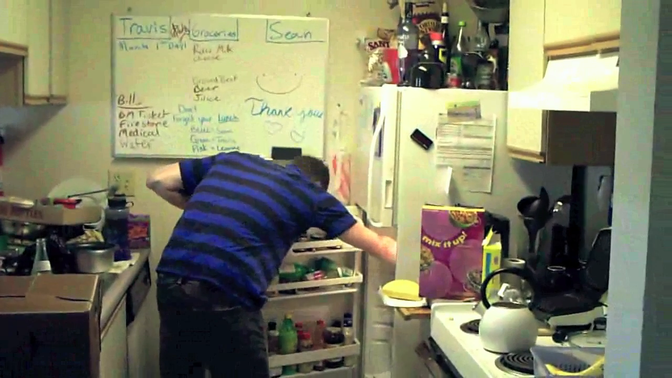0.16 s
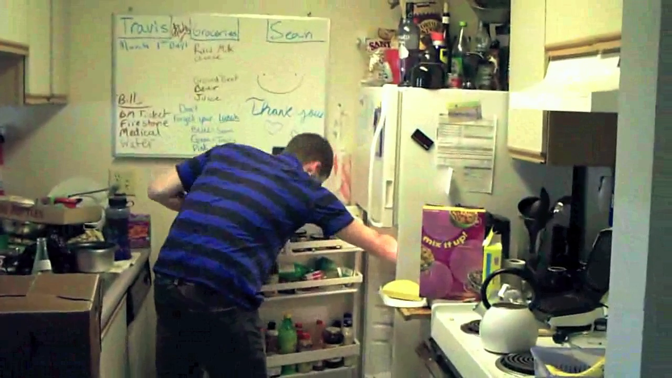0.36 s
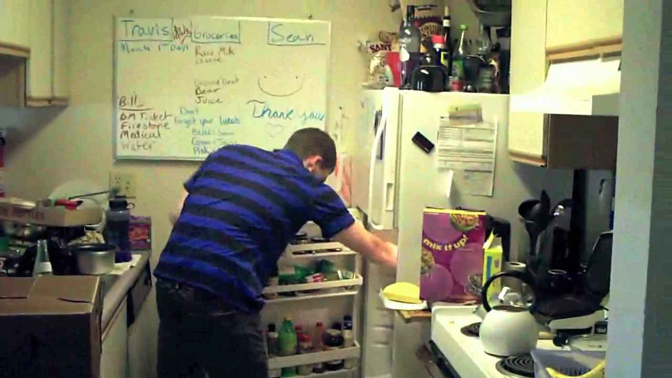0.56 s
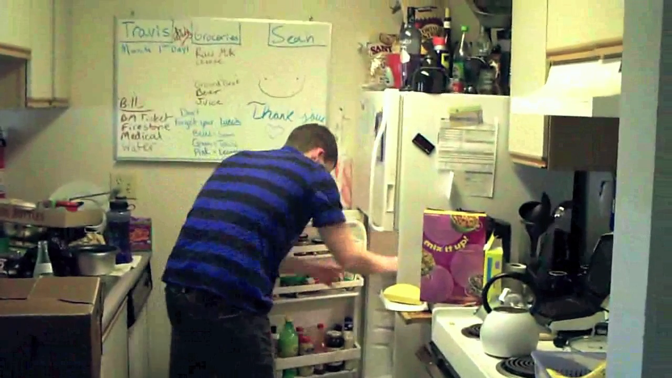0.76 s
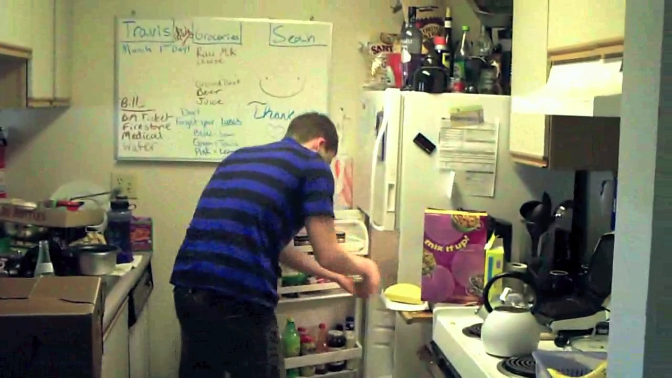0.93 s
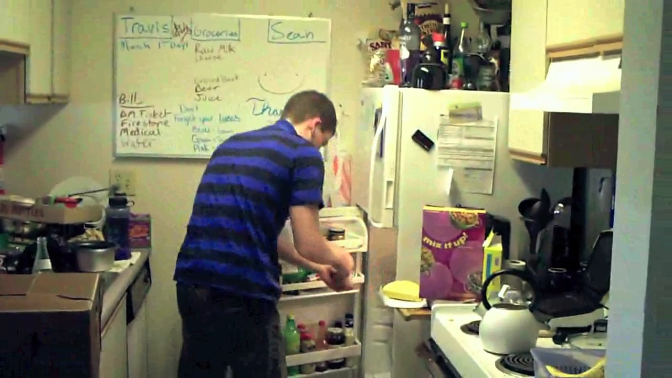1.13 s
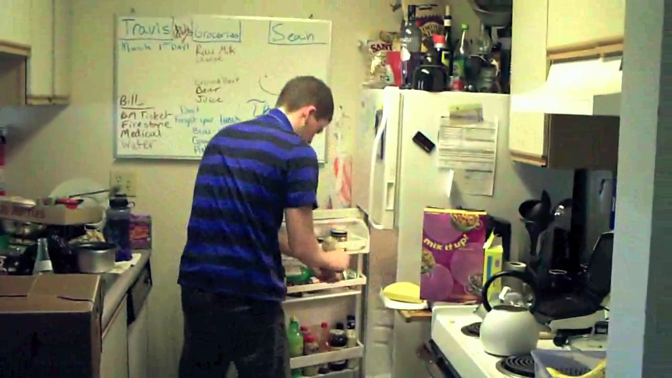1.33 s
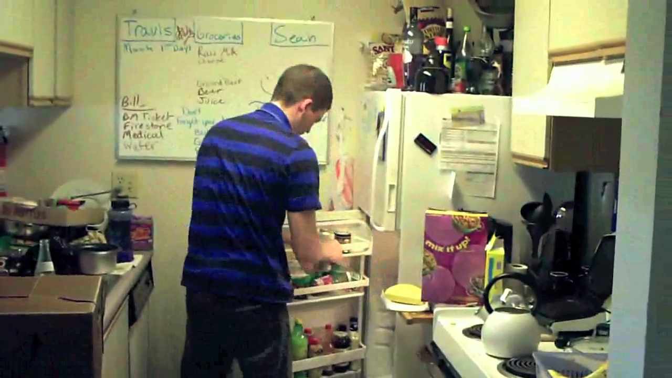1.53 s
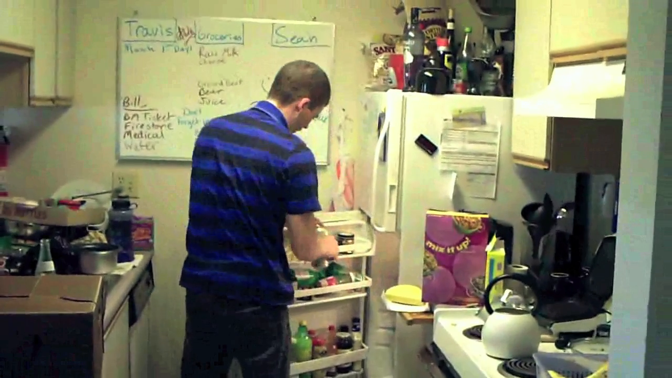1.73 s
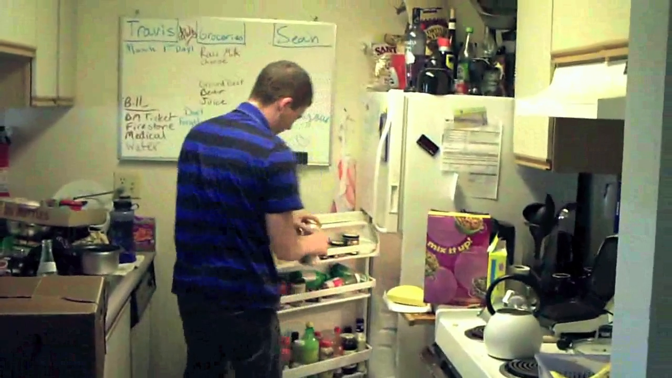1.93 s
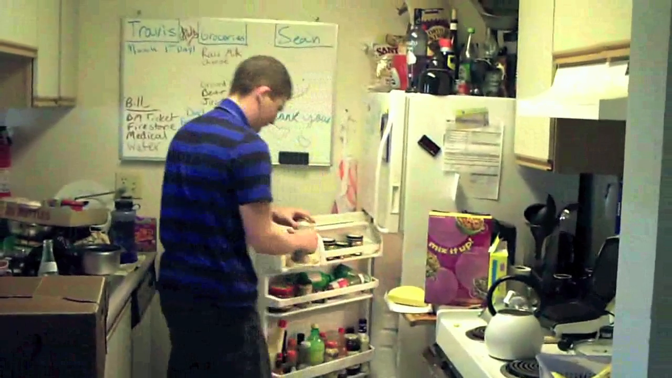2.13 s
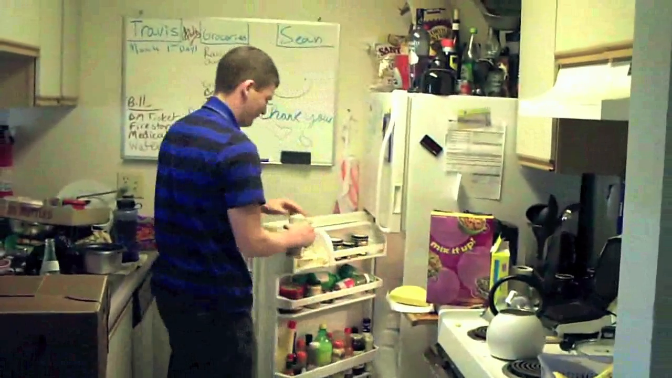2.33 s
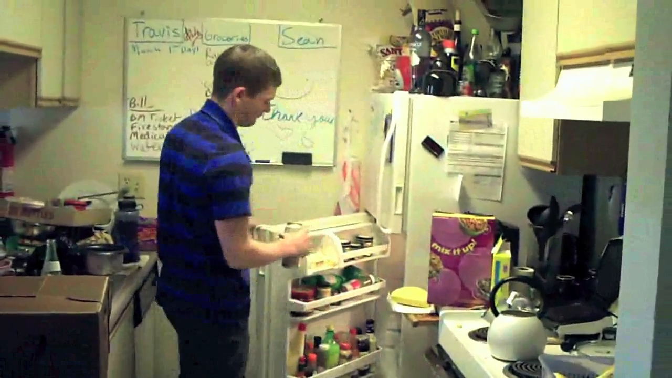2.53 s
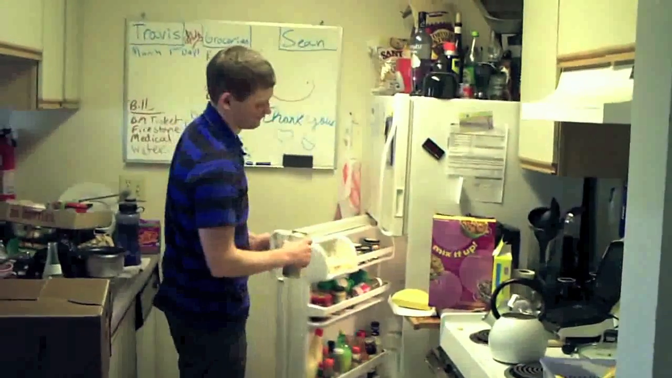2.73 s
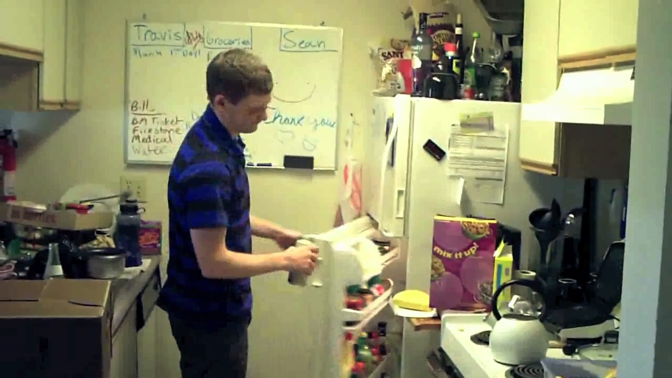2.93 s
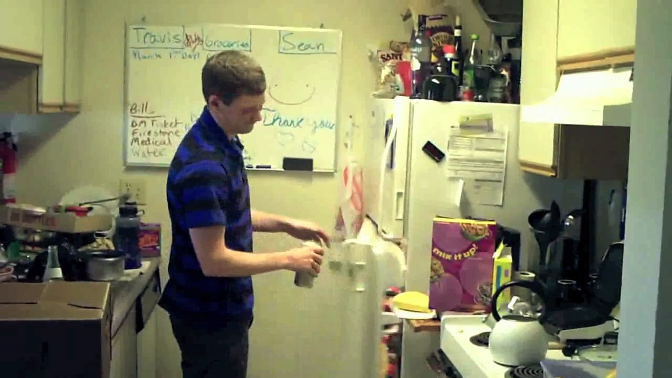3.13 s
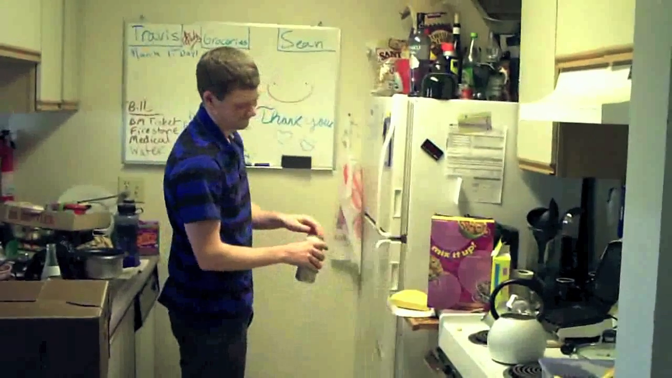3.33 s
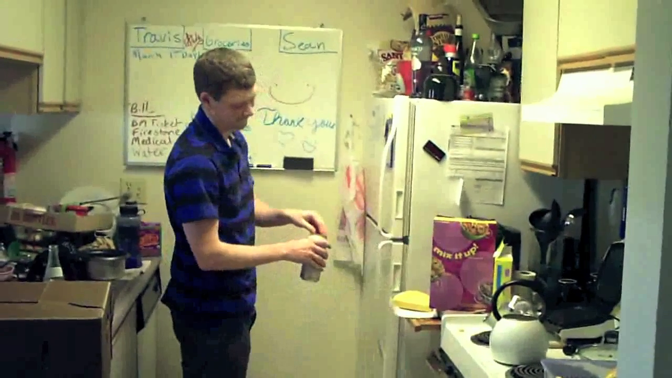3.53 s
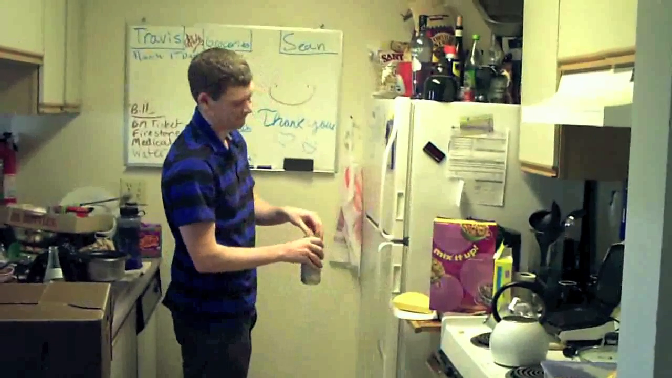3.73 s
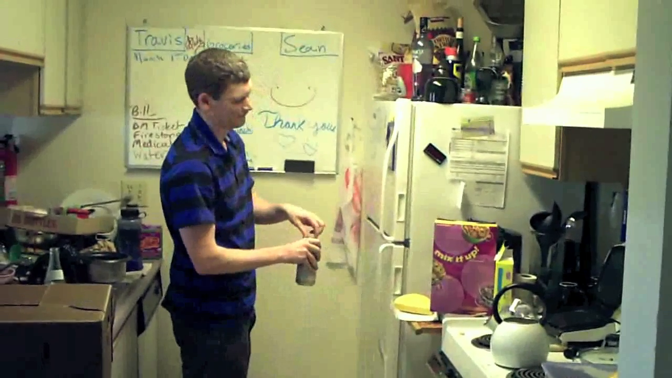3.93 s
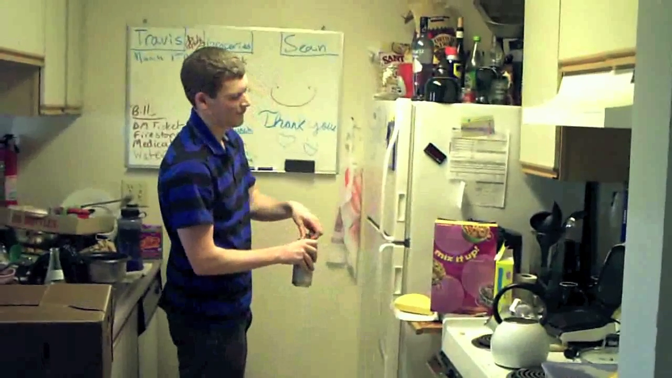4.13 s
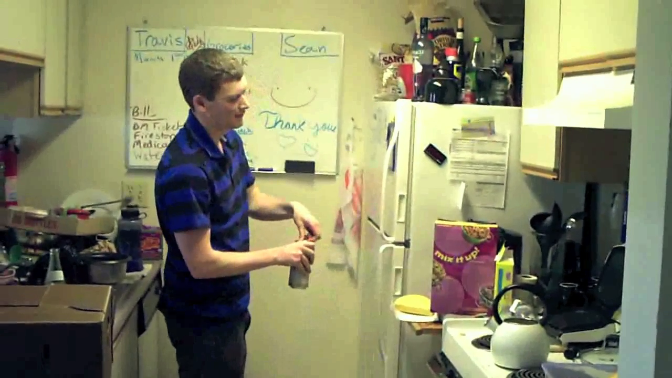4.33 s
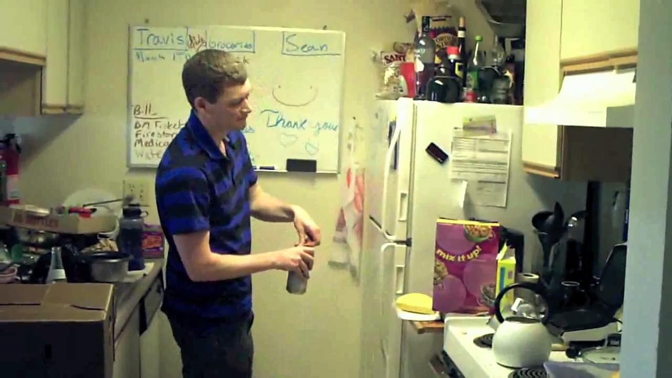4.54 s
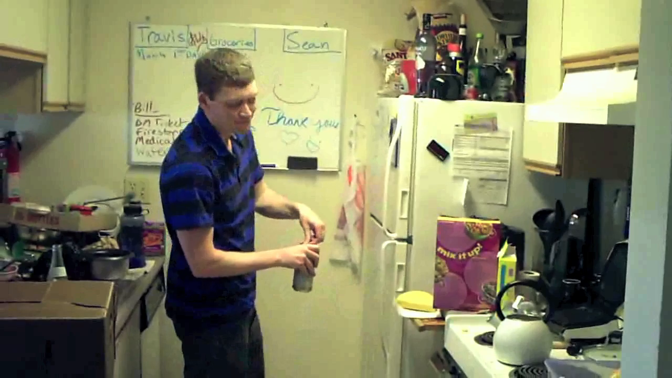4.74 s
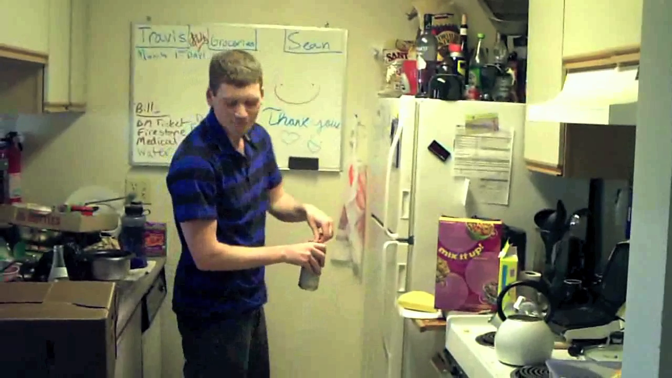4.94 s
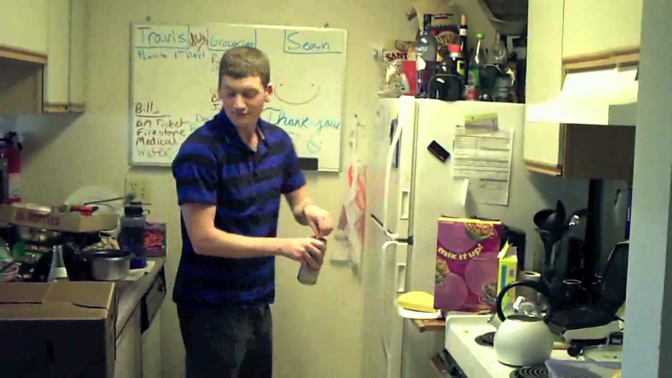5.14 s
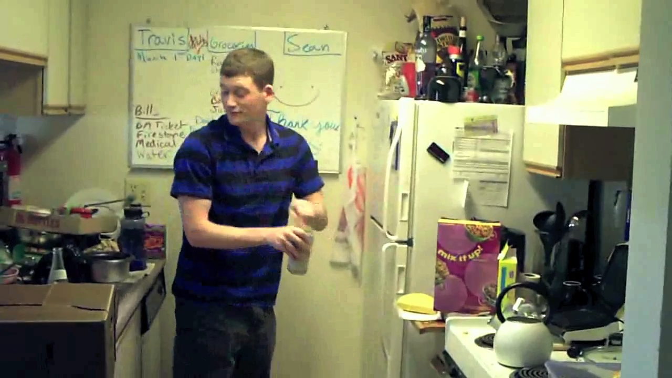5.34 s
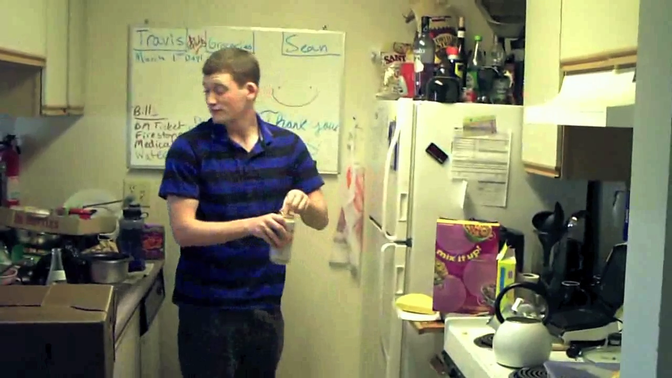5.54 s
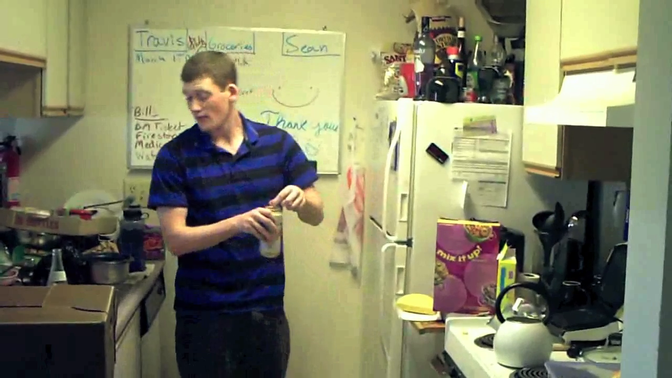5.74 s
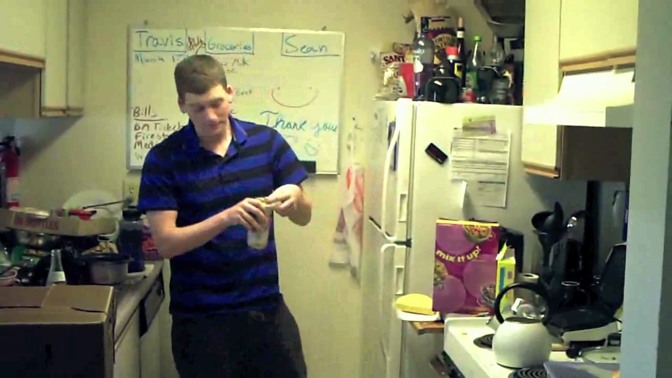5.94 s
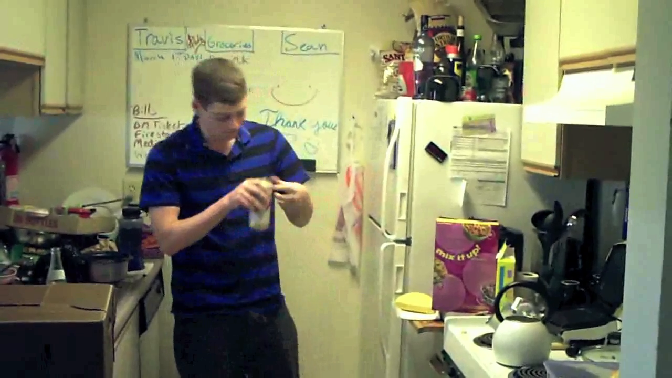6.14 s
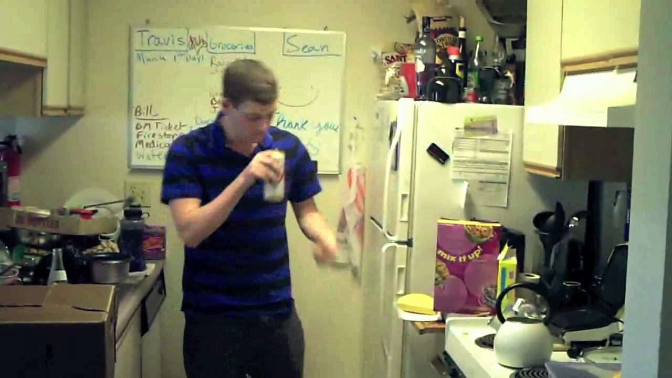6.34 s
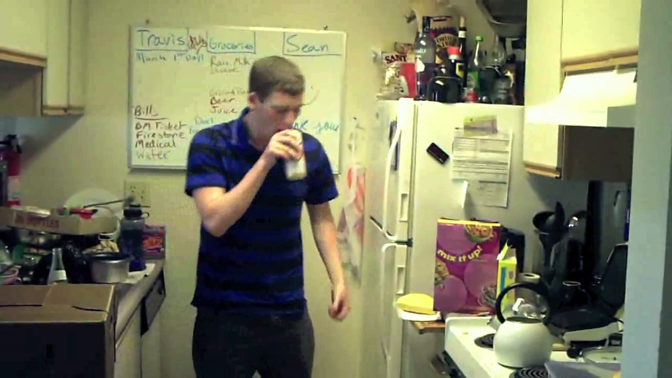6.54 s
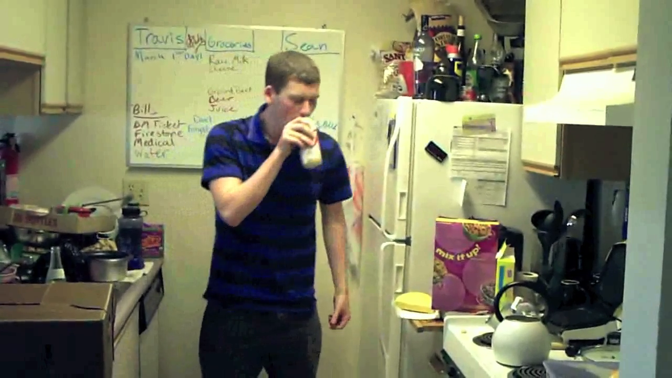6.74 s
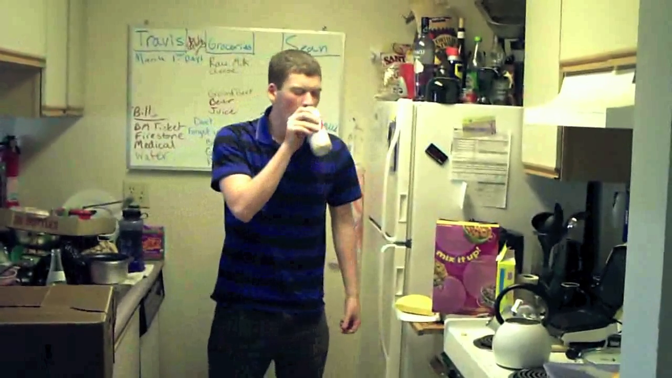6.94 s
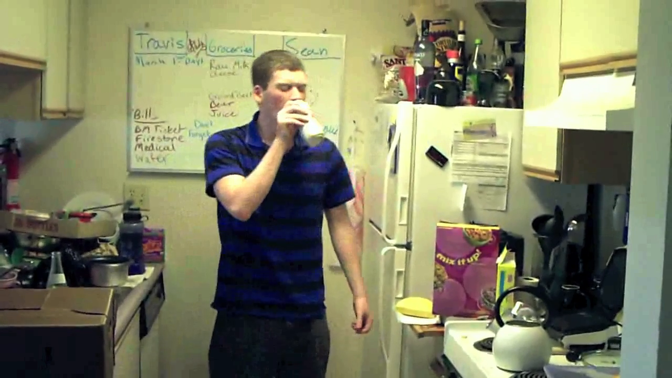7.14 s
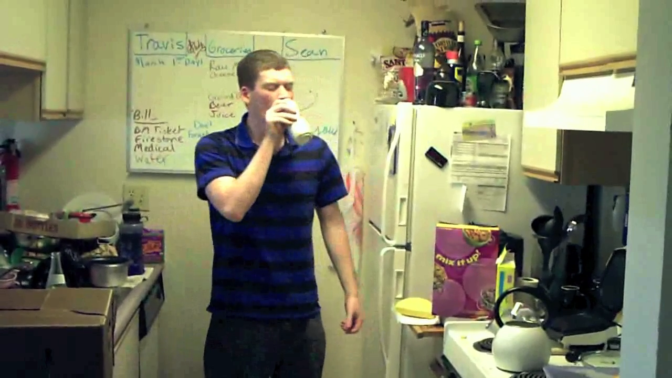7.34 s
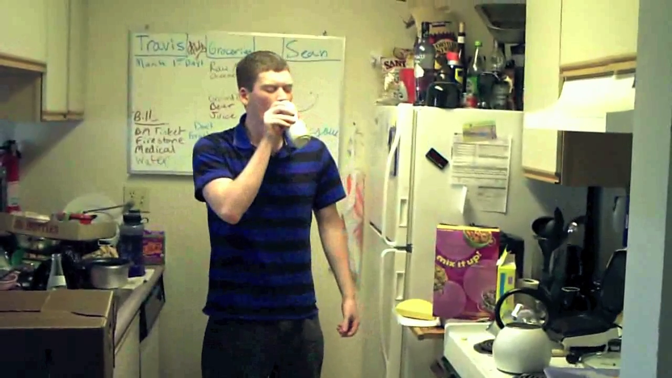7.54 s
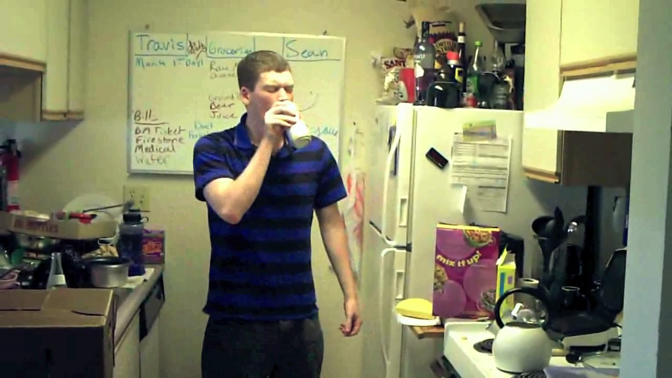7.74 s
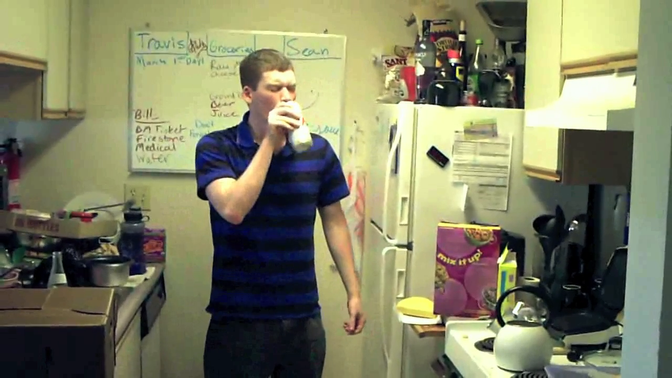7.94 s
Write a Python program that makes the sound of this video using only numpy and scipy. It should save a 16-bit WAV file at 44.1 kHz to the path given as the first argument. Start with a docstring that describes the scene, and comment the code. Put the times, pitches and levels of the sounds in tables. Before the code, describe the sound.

In a humming kitchen, things knock in a refrigerator, its door closes with a thump, then a can clicks, hisses and cracks open.

```python
"""A small kitchen, where a man takes a beer can from the fridge. Bottles knock in the racks and the door
shuts with a thump of displaced air; the tab clicks, gas hisses out as a turbulent jet and the lid cracks
open. Each impact excites the modes of the struck body, then the room. Clothes rustle, the compressor
hums and the fridge whines. Across the room, a small camera microphone with a sharp treble resonance
picks it all up and clips on the loudest peaks."""
import sys
import numpy as np
from scipy import signal
from scipy.fft import rfft, irfft, next_fast_len
from scipy.io import wavfile
from scipy.ndimage import uniform_filter1d

SR = 44100
rng = np.random.default_rng(int(sys.argv[2]) if len(sys.argv) > 2 else 0)


def put_to_file(sound):
    """Save the sound as 16-bit audio at rate SR, in the file named by the first command-line argument."""
    columns = np.atleast_2d(sound).T  # one column per channel
    safe = np.clip(columns, -1, 1)
    whole_steps = np.round(safe * 32767)
    wavfile.write(sys.argv[1], SR, whole_steps.astype(np.int16))


N = 351918
TIME = np.arange(N) / SR
RING = np.arange(int(.8 * SR)) / SR  # t/s within one event


def beer_can():
    """Impact and fracture: the tab clicks, the scored lid splits and tears open, and the can resonates."""
    # fingers and tab on the can: t/s, clatter time/s, level/dB, brightness/(dB per band), hollowness/dB
    touches = [(4.272, .026, -59.5, 2.5, -1), (4.295, 0.014, -49.5, 3.5, -1.5),
               (4.424, .005, -37.5, 4.5, -5), (4.726, .022, -47, 3.5, 0.5), (4.771, .002, -48, -0.5, -1.5),
               (5.028, 0.0058, -51, 2.5, -0.5), (5.034, .01, -46.5, 5.5, 5.5), (5.074, 0.024, -42, 5, 0),
               (5.835, .024, -51, 3, 0)]
    # the lid splits in two quick steps; same columns
    splits = [(4.508, .006, -29.5, 5, -3), (4.516, 0.031, -36, 3.4, -3.5)]
    # the lid tears open with a pop; same columns
    pop = [(5.109, 0.02, -21, 4.7, 4.3)]
    # modes of the can: f/Hz, level/dB, T60/s
    modes = [(1070, -6.5, 0.065), (1230, -7, 0.056), (1250, -2.5, 0.033), (1422, -3.5, .08),
             (1481, 9, 0.21), (2120, -11, .07), (3970, -3.5, 0.22), (4470, -11.5, 0.081)]
    # spectrum of the touches and splits: low f/Hz, high f/Hz, gain/dB
    bands = [(100, 970, 0.0017), (850, 1800, 0), (1760, 3500, 0), (3500, 9000, 0)]
    # spectrum of the pop; same columns
    pop_bands = [(100, 1050, 2), (1110, 1800, 3), (1800, 3500, -2), (3660, 9000, 2.5)]
    return (impacts(touches, bands, modes, ring_db=-25, contacts_per_s=2500, first_db=3, direct_db=-1)
            + impacts(splits, bands, modes, ring_db=-25, contacts_per_s=2500, first_db=4, direct_db=3)
            + impacts(pop, pop_bands, modes, ring_db=-26, contacts_per_s=6000, first_db=5, direct_db=4))


def gas_jet():
    """Turbulent jet noise: gas escapes through the lid in two spurts, then leaks, sputtering on foam."""
    # spectrum of the jet: f/Hz, level/dB
    spectrum = [(200, -21.5), (800, -7), (2700, -5.5), (3800, -3.5), (4400, -10), (4750, -1.5),
                (5020, -2.5), (5500, -1.5), (6100, -3.5), (8000, -5.5)]
    # spurts as the tab bites and as the lid splits: t/s, level/dB
    spurts = [(4.425, -32), (4.508, -28)]
    leak_start_s, leak_end_s, ramp_s = 4.53, 4.94, .055
    attack_s, decay_s = .0063, .019
    flow = undb(-47.5 + 7 * bump(4.795, .035))  # the leak swells as the tab lifts further
    flow *= np.clip(np.minimum(TIME - leak_start_s, leak_end_s - TIME) / ramp_s, 0, 1)
    for s, db in spurts:
        add(flow, s, undb(db) * np.minimum(RING / attack_s, 1) * np.exp(-RING / decay_s))
    jet = unit(colour(rng.standard_normal(N), spectrum))
    sputter = undb(3.5 * walk(250))
    return kitchen(jet * sputter * flow, direct_db=3)


def fridge_knocks():
    """Impact excitation: bottles, racks and handled things knock and set the fridge door ringing."""
    # knocks: t/s, clatter time/s, level/dB, brightness/(dB per band), hollowness/dB
    knocks = [(.232, 0.067, -56, -12.5, 10), (.264, .03, -46.5, -7, -1), (.297, 0.023, -38, -8.5, 3.5),
              (.465, 0.013, -59.5, 3.5, 12), (1.458, 0.071, -55.5, -0.5, 16.5), (1.732, 0.021, -57, 4, 9),
              (1.796, 0.011, -51, 8, 6.5), (1.993, 0.0032, -40, -2.7, 3.5), (2.118, 0.0052, -53.5, 1, 6),
              (2.138, 0.0036, -49, 0.2, 2.5), (2.427, 0.0091, -45, -5.5, 1.5),
              (2.646, 0.02, -44.5, -8.5, 3.5), (3.133, .013, -55, -3, 4.5), (3.354, 0.034, -42, -7.5, 0.5),
              (3.362, 0.017, -31, -1.5, 1), (3.408, 0.05, -40.5, -5.5, 7.5), (3.519, 0.021, -48, -6, -1),
              (3.637, 0.017, -46, -4.5, -5), (5.482, 0.0045, -53.5, -4, 0.5),
              (6.183, 0.012, -40, -3.5, 2.5), (6.254, 0.0062, -44.5, -4.5, 6),
              (6.265, 0.0053, -49, -1.5, 7), (7.062, 0.011, -43, -2.5, 4)]
    # modes of the door: f/Hz, level/dB, T60/s
    modes = [(286.1, 8, 0.36), (830, -8, 0.27), (931, 1.5, 0.25), (1200, 2.5, 0.031), (1486, -7, 0.15),
             (1775, -13, 0.22)]
    # spectrum of a knock: low f/Hz, high f/Hz, gain/dB
    bands = [(139, 397, -3), (537, 1285, 0.53), (1510, 2960, -1.6), (2780, 11800, 1.7)]
    # things shift faintly in the racks at random moments while he rummages
    jostles = [(.1 + 2.4 * when, .02, -54.5 - 6 * softness, -1.5, 8)
               for when, softness in rng.random((8, 2))]
    return impacts(knocks + jostles, bands, modes,
                   ring_db=-21, contacts_per_s=1800, first_db=6, direct_db=-1)


def thumps():
    """Damped oscillation of air pushed by the door and by steps; the lower it is, the longer it lasts."""
    # pushes of air: t/s, lowest f/Hz, level/dB
    pushes = [(0.348, 11, -35.5), (2.007, 34, -19), (2.421, 24, -17), (2.72, 20, -28), (3.362, 19, -3.5),
              (3.639, 16, -19), (5.651, 15, -28), (6.19, 60, -29), (6.84, 15, -28), (7.088, 52.4, -26),
              (7.37, 22, -27.5)]
    # modes of each thump: ratio to lowest f, level/dB, decay/cycles
    modes = [(1, -0.5, 1.6), (1.55, -15, 3), (2.2, -16, 5.2), (3.3, -24.5, 3.2)]
    out = np.zeros(N)
    for s, hz, db in pushes:
        for ratio, mode_db, decay_cycles in modes:
            cycles = hz * ratio * RING
            add(out, s, undb(db + mode_db) * np.sin(2 * np.pi * cycles) * np.exp(-cycles / decay_cycles))
    return out


def clinks():
    """Free vibration of glass and metal, quickly damped by the racks or the hand."""
    # bottles or the can touch something: t/s, f/Hz, level/dB, T60/s
    touches = [(1.798, 4810, -47.5, 0.036), (1.798, 4150, -47, 0.054), (2.139, 4560, -51.5, 0.03),
               (3.363, 4410, -41.5, 0.029), (3.365, 4666, -41, 0.031), (3.636, 4280, -49.5, 0.015),
               (6.263, 2022, -34.5, .02)]
    out = np.zeros(N)
    for s, hz, db, t60 in touches:
        add(out, s, damped_mode(hz, db, t60))
    return kitchen(out, direct_db=8.5)


def squeaks():
    """Stick-slip friction: soles, hinge and fingers each rub briefly at one resonance."""
    # rubs: t/s, f/Hz, level/dB, duration/s, half bandwidth as a fraction of f
    rubs = [(1.45, 279, -33, 0.051, 0.065), (1.453, 2980, -41.5, 0.028, 0.045),
            (1.58, 2760, -55, .035, 0.044), (2.747, 3260, -46.5, .02, .04),
            (5.035, 3050, -30, 0.021, 0.073), (6.141, 1810, -47.5, .03, 0.042),
            (6.514, 4500, -62, 0.037, 0.21), (7.123, 2030, -47, 0.035, 0.099)]
    out = np.zeros(N)
    for s, hz, db, length_s, width in rubs:
        rub = unit(band(rng.standard_normal(len(RING)), hz * (1 - width), hz * (1 + width), order=2))
        arch = np.sin(np.pi * np.minimum(RING / length_s, 1))
        add(out, s, undb(db) * kitchen(rub * arch, direct_db=-6))
    return out


def rustle(ticks_per_s=600, still_db=-66.5):
    """Shot noise: clothes and packaging give many faint, uneven ticks that swell with each movement."""
    # movements: middle t/s, half duration/s, level/dB
    moves = [(.1, 0.79, -56.5), (1.207, 0.38, -61.5), (2.203, 0.58, -54), (3.644, 0.3, -52.5),
             (5.197, 0.37, -58.5), (6.02, .22, -59)]
    # spectrum of the ticks: f/Hz, level/dB
    spectrum = [(80, -24), (280, 8.5), (550, -5), (1000, -2), (2000, -8), (3500, -16.5), (6500, -19.5),
                (9000, -35.5)]
    motion = undb(still_db) + sum(undb(db) * bump(s, half_s) for s, half_s, db in moves)
    ticks = impulses(N, ticks_per_s / SR) * undb(4 * walk(40))
    return kitchen(unit(colour(ticks, spectrum)) * motion, direct_db=-1)


def compressor_hum():
    """Periodic motor vibration gives a line spectrum; the lines waver, and the second swells twice."""
    # compressor lines: f/Hz, level/dB
    lines = [(56.6, -56.5), (113.2, -58.5), (204.6, -58), (306.8, -59), (818.3, -61.5)]
    # swells of the second line: middle t/s, half duration/s, level/dB
    swells = [(1.14, 0.5, -54), (7.4, 0.51, -51)]
    swell = sum(undb(db) * bump(s, half_s) for s, half_s, db in swells)
    second_line = np.sqrt(2) * np.sin(2 * np.pi * lines[1][0] * TIME)
    return tones(lines, waver_db=3, drift_hz=2.2) + swell * second_line


def fridge_whine():
    """Amplitude modulation: a thin squeal catches and lets go at random as it builds and dies away."""
    # low pair of lines: f/Hz, relative level/dB
    low_lines = [(2326, 0), (2369, -13)]
    # upper lines, which die away faster; same columns
    high_lines = [(3833, 8), (4745, -3), (6282, -7)]
    peak_s, door_shut_s = 1.2, 3.36
    rise_db_per_s, low_fall_db_per_s, high_fall_db_per_s = 7, 1.5, 2.5
    before, after = np.maximum(peak_s - TIME, 0), np.maximum(TIME - peak_s, 0)
    spells_db = 5.5 * np.tanh(2 * walk(14))
    muffle_db = -2.5 * (TIME > door_shut_s)
    shared_db = spells_db + muffle_db - rise_db_per_s * before
    low = undb(-59.5 - low_fall_db_per_s * after) * tones(low_lines, waver_db=3.2, drift_hz=9)
    high = undb(-80 - high_fall_db_per_s * after) * tones(high_lines, waver_db=3.2, drift_hz=12)
    return undb(shared_db) * (low + high)


def air_rush(rms_db=-41.5):
    """Stationary broadband noise: the steady rush of the fan and the room air."""
    # spectrum of the rush: f/Hz, relative spectral density/dB
    spectrum = [(6, -7), (16, 20.5), (40, -1.5), (80, -4.5), (150, -8), (270, -4), (400, -11.5), (560, -15),
                (850, -10), (1300, -17), (1900, -23.5), (3000, -28), (4500, -44.5), (6200, -41.5)]
    return unit(colour(rng.standard_normal(N), spectrum)) * undb(rms_db)


def impacts(table, bands, modes, ring_db, contacts_per_s, first_db, direct_db):
    """Convolution: a first contact and a dying run of tiny ones ring the body and then the room."""
    body = sum(damped_mode(hz, db, t60) for hz, db, t60 in modes)
    body /= np.linalg.norm(body)
    steps = np.arange(len(bands)) - (len(bands) - 1) / 2  # band positions about the middle
    attack = int(.03 * SR)
    out = np.zeros(N)
    for s, clatter_s, level_db, bright_db, hollow_db in table:
        contacts = impulses(len(RING), contacts_per_s / SR) * np.exp(-(RING / clatter_s) ** 2)
        contacts[0] = undb(first_db)
        ringing = undb(ring_db) * signal.fftconvolve(contacts, body)[:len(RING)]
        sound = kitchen(contacts + ringing, direct_db)
        # a hard contact tilts the attack towards the treble, a hollow body arches it in the middle
        for (lo_hz, hi_hz, db), step in zip(bands, steps):
            part = band(sound, lo_hz, hi_hz)
            colour_db = db + bright_db * step + hollow_db * (1 - abs(step))
            add(out, s, undb(level_db + colour_db) * part / np.std(part[:attack]))
    return out


def kitchen(x, direct_db, t60_s=.29, bass_t60_s=.86):
    """Reverberation: direct sound, separate early reflections that thicken, and a longer bass tail."""
    density = np.clip(.02 + (RING / .07) ** 2, 0, 1)
    echoes = impulses(len(RING), density) / np.sqrt(density)
    bass = band(rng.standard_normal(len(RING)), 55, 420, order=2)
    response = echoes * fade(t60_s) + undb(-9.5) * bass * fade(bass_t60_s)
    response /= np.linalg.norm(response)
    response[0] += undb(direct_db)
    return signal.fftconvolve(x, response)[:len(x)]


def tones(lines, waver_db, drift_hz):
    """Sinusoids (f/Hz, level/dB), each randomly modulated in level and frequency."""
    out = np.zeros(N)
    for hz, db in lines:
        amplitude = np.sqrt(2) * undb(db + waver_db * walk(28))
        cycles = np.cumsum(hz + drift_hz * walk(40)) / SR
        out += amplitude * np.sin(2 * np.pi * cycles)
    return out


def colour(x, points):
    """Minimum-phase filter through (f/Hz, gain/dB) points, by folding the cepstrum."""
    size = next_fast_len(len(x) + SR // 2, real=True)
    hz, db = np.transpose(points)
    bin_hz = np.arange(size // 2 + 1) * SR / size
    gain = undb(np.interp(np.log(bin_hz + 1), np.log(hz), db))
    cepstrum = irfft(np.log(gain), size)
    cepstrum[1:size // 2] *= 2
    cepstrum[size // 2:] = 0
    return irfft(rfft(x, size) * np.exp(rfft(cepstrum)), size)[:len(x)]


def band(x, lo_hz, hi_hz, order=3):
    """Causal band-pass filter."""
    return signal.sosfilt(signal.butter(order, [lo_hz, hi_hz], "band", fs=SR, output="sos"), x)


def impulses(n, chance):
    """Random impulse train with the given chance per sample."""
    return rng.standard_normal(n) * (rng.random(n) < chance)


def walk(rate_hz):
    """Smoothed random steps, spread near 1."""
    k = int(SR / rate_hz)
    steps = np.repeat(rng.standard_normal(N // k + 1), k)
    return uniform_filter1d(uniform_filter1d(steps, k), k)[:N]


def damped_mode(hz, db, t60):
    """Impulse response of one resonance."""
    return undb(db) * fade(t60) * np.sin(2 * np.pi * hz * RING)


def fade(t60):
    """Exponential decay by 60 dB in t60 seconds."""
    return np.exp(-np.log(1000) * RING / t60)


def bump(middle_s, half_s):
    """Bell-shaped envelope, peak 1."""
    return np.exp(-((TIME - middle_s) / half_s) ** 2)


def undb(db):
    """Decibels to amplitude ratio."""
    return 10 ** (np.asarray(db) / 20)


def unit(x):
    """Scale to rms 1."""
    return x / np.sqrt(np.mean(x ** 2))


def add(out, s, x):
    """Superpose x from time s."""
    i = int(s * SR)
    out[i:i + len(x)] += x[:N - i]


def scene():
    """Superposition of all the sources in one channel."""
    events = fridge_knocks() + beer_can() + clinks() + thumps() + squeaks() + gas_jet()
    return (events + compressor_hum() + fridge_whine() + rustle() + air_rush())[None]


def record(dry, clip_level=.7, top_hz=15800):
    """Resonance and saturation: the microphone rings in the treble, passes little above, and clips."""
    # microphone response: f/Hz, gain/dB
    response = [(5, -18), (14, -4.5), (2400, 2), (2800, -2), (3600, 2.5), (4100, 9.5), (4350, 15.5),
                (4850, 15.5), (5200, 5.5), (5550, -1), (6050, 0.5), (6300, -1), (6600, -9), (7000, -31),
                (7600, -50.5)]
    clipped = np.clip(colour(dry[0], response), -clip_level, clip_level)
    low_pass = signal.ellip(8, .1, 60, top_hz, fs=SR, output="sos")
    return signal.sosfiltfilt(low_pass, clipped)[None]


dry = scene()
out = record(dry)
put_to_file(out)
```